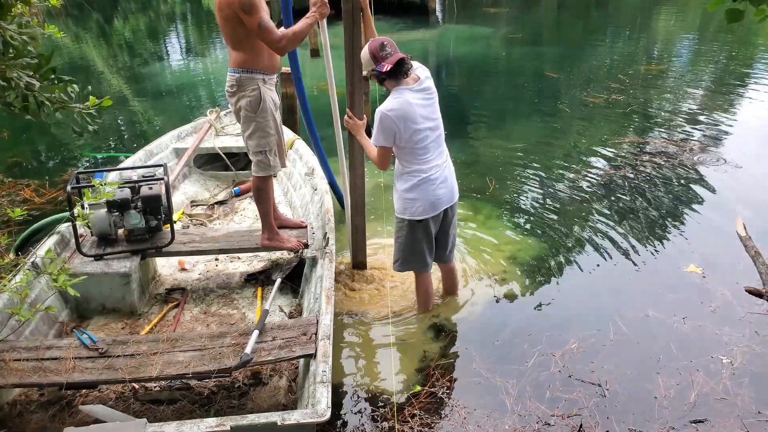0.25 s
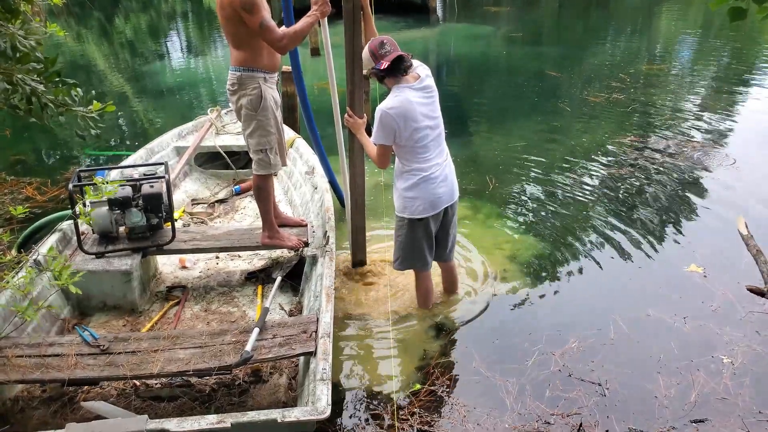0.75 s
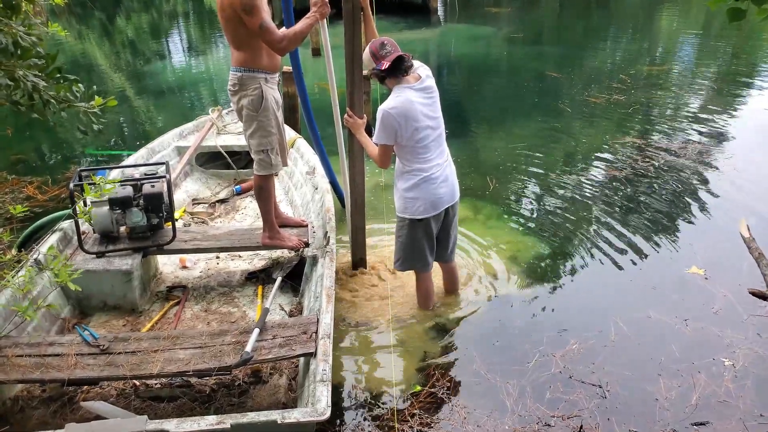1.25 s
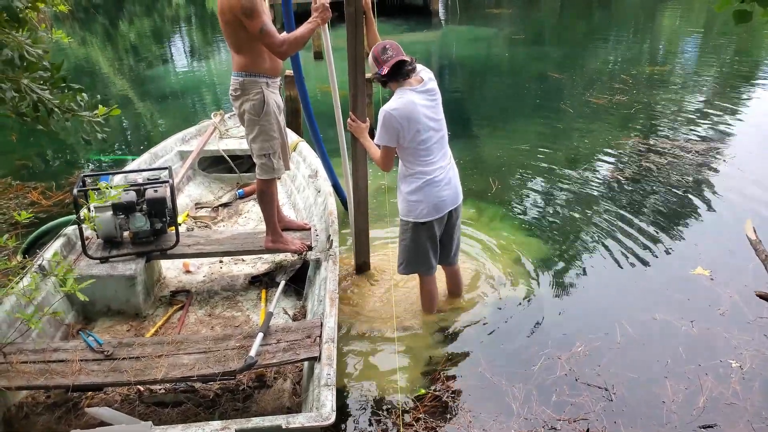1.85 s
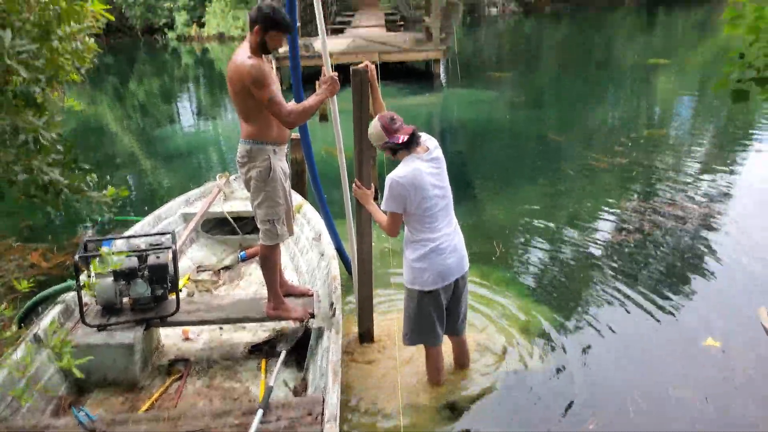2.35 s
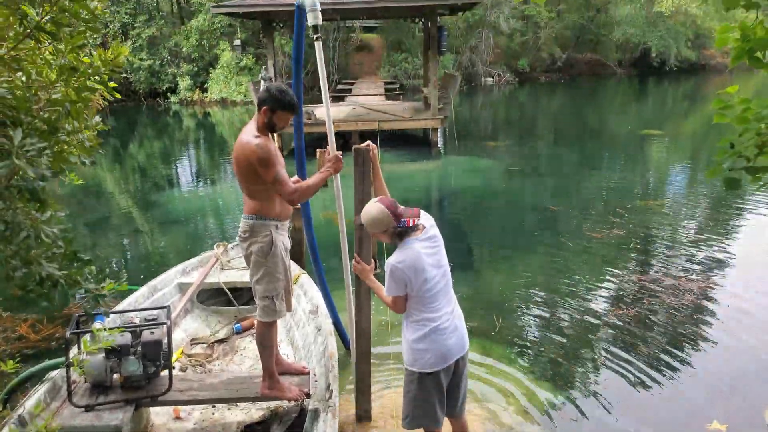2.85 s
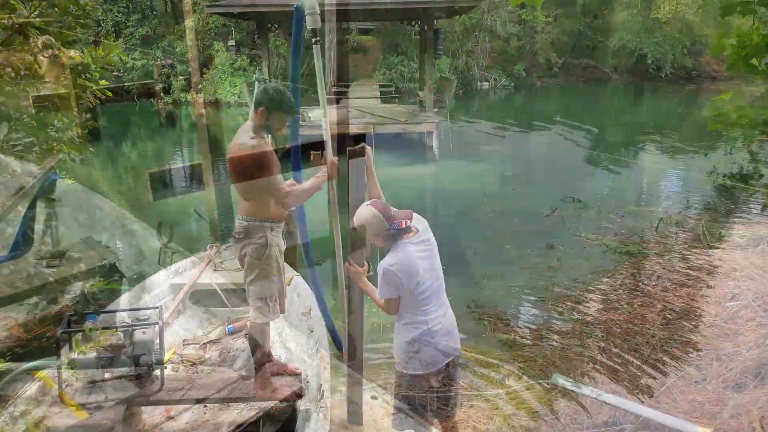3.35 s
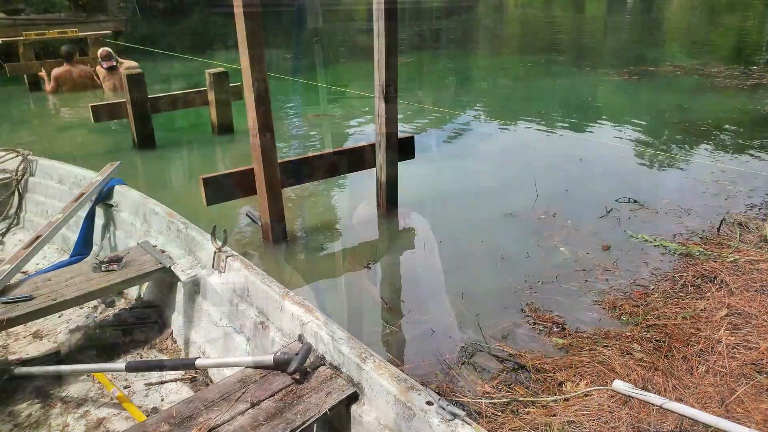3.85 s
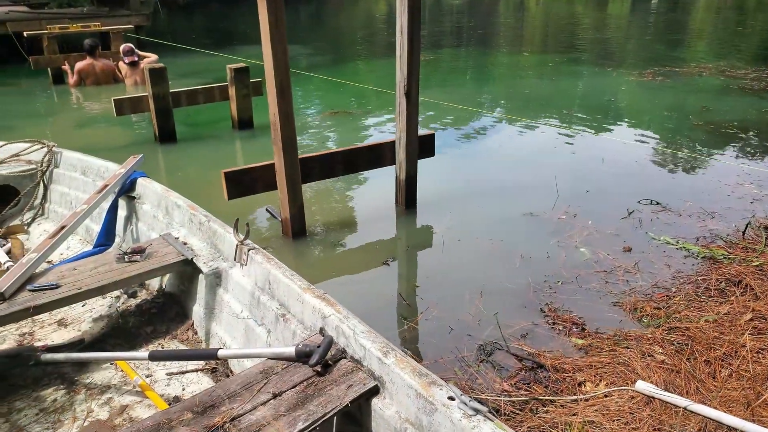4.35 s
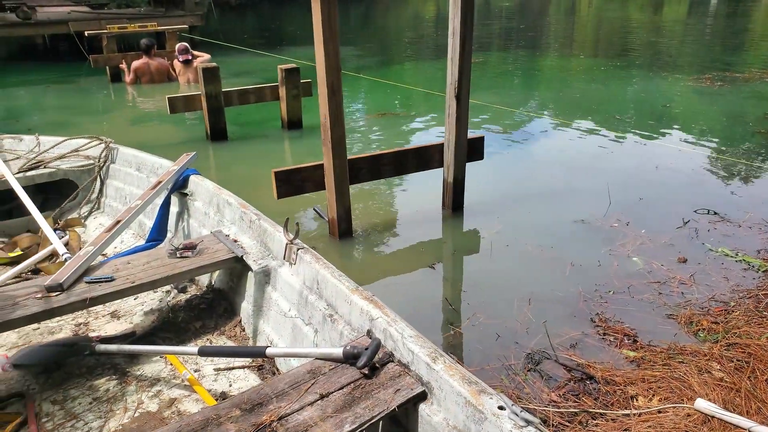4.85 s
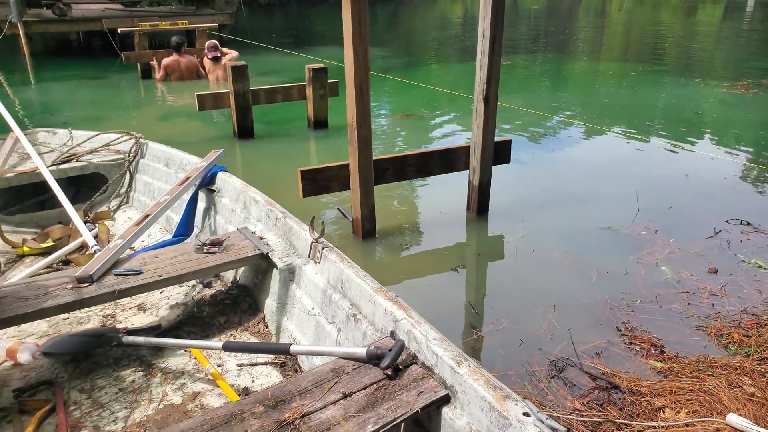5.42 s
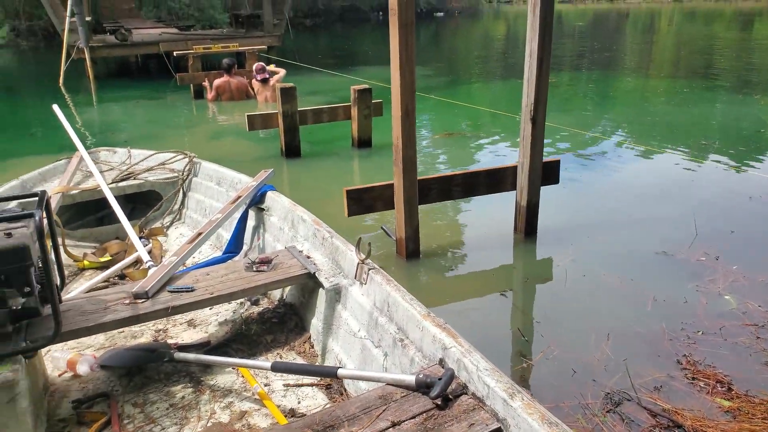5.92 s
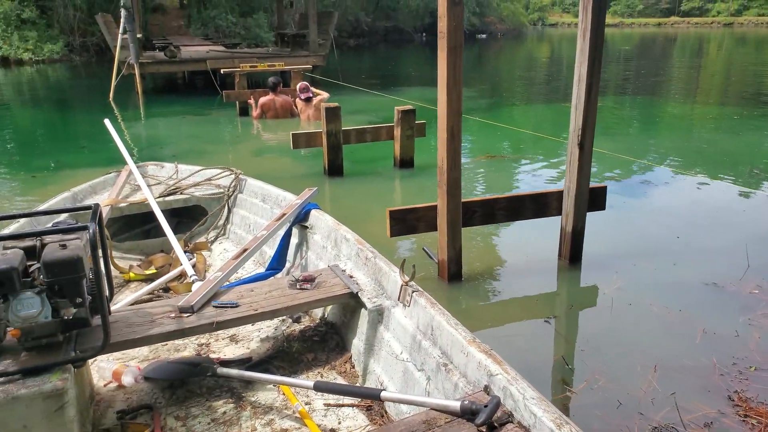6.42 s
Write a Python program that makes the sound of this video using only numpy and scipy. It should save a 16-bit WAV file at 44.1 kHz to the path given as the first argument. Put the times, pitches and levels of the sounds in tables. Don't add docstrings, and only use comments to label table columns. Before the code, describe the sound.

A small single-cylinder petrol pump runs close by in a boat, a rapid even putter with exhaust hiss, metallic ringing and clatter. Around the middle it crossfades gradually into a much quieter lake shore: two far engines throb and swell over soft air, rumble and thin insect song. Then wet wood is rubbed in two loud rasping, squeaky strokes, with hard knocks on the second and a few faint ones after. Stereo, weighted to the left.

```python
import sys
import numpy as np
from scipy import signal
from scipy.fft import rfft, irfft
from scipy.io import wavfile

SR = 44100
rng = np.random.default_rng(int(sys.argv[2]) if len(sys.argv) > 2 else 0)


def to_wav(sig):
    pcm = np.clip(np.atleast_2d(sig), -1, 1) * 32767
    pcm = np.round(pcm).astype(np.int16)
    wavfile.write(sys.argv[1], SR, pcm.T)


def convert_level_to_amplitude(level_db):
    exponent = np.asarray(level_db, float) / 20
    return 10 ** exponent


N = 294588
TIME = np.arange(N) / SR
HZ = np.maximum(np.fft.rfftfreq(N, 1 / SR), 10)


def rms_one(x):
    return x / np.sqrt(np.mean(np.atleast_2d(x).mean(axis=0) ** 2) + 1e-20)


def in_time(rows):
    seconds, *columns = np.transpose(rows)
    return [np.interp(TIME, seconds, column) for column in columns]


def at_hz(points):
    hz, db = np.transpose(points)
    return np.interp(np.log(HZ), np.log(hz), db)


def drift(rate_hz):
    r = np.exp(-80 * np.pi * rate_hz / SR)
    slow = signal.lfilter([1], [1, -2 * r, r * r], rng.standard_normal(N // 40 + 2002))
    slow = slow[2000:]
    return np.interp(np.arange(N) / 40, np.arange(len(slow)), rms_one(slow - slow.mean()))


def ring(clicks, hz, t60_s):
    r = convert_level_to_amplitude(-60 / (t60_s * SR))
    w = 2 * np.pi * hz / SR
    return signal.lfilter([0, np.sin(w)], [1, -2 * r * np.cos(w), r * r], clicks + 1e-18)


def orders(cycles, table, wander_db, phase):
    tones = 0
    for k, db in table:
        tones = tones + convert_level_to_amplitude(db + wander_db * drift(7.0)) * np.cos(2 * np.pi * k * cycles + phase(k))
    return tones


FLAT = ((10, 0), (20, 0))


def ports(x, other, left_db, alike, lag_s, colour=FLAT):
    left = convert_level_to_amplitude(at_hz(left_db))
    share = np.clip(at_hz(alike), 0, 1)
    late = np.exp(-2j * np.pi * HZ * lag_s)
    gain = 2 * convert_level_to_amplitude(at_hz(colour)) / np.sqrt(left ** 2 + 1 + 2 * left * share * late.real)
    right = late * share * rfft(x) + np.sqrt(1 - share ** 2) * rfft(other)
    return irfft(gain * np.array([left * rfft(x), right]), N)


# frequency in Hz, left over right in dB.
PUMP_LEFT = [(60, 8.8), (110, 9.2), (200, 10.2), (380, 9.6), (700, 9.9), (1290, 1.15), (2380, 10.6),
             (4400, 13.4), (8120, 4.9), (15000, 5.8)]
# frequency in Hz, likeness from 0 to 1.
PUMP_ALIKE = [(60, .97), (600, .94), (1500, .84), (3000, .62), (8000, .42)]
NEAR_LAG_S = .00018


def pump_ports(x, other, colour=FLAT, alike=PUMP_ALIKE):
    return ports(x, other, PUMP_LEFT, alike, NEAR_LAG_S, colour)


# multiple of the firing rate, level in dB.
PUMP_ORDERS = [(1, -21.5), (2, -3.5), (3, -1.5), (4, 1), (5, -4.5), (6, -4), (7, -12.5), (8, -14.5),
               (9, -11.5), (10, -16), (11, -69.5), (12, -15), (13, -14), (14, -29), (15, -23.5),
               (16, -18.5), (17, -45), (18, -15.5), (19, -11.5), (20, -23), (21, -22.5), (22, -15.5),
               (23, -13.5), (24, -24), (25, -15), (26, -26), (27, -50), (28, -22.5), (29, -52), (30, -19)]


def exhaust(cycles):
    pulse_at, pipe_echo, echo_share = .062, .283, .9
    chamber_lag = .14

    def phase(k):
        echo = echo_share * np.exp(-2j * np.pi * k * pipe_echo)
        beat = np.angle(echo - 1) - 2 * np.pi * k * pulse_at
        return beat - 2 * np.pi * chamber_lag * (3 <= k <= 7)

    tones = orders(cycles + 0.00065 * drift(4.5), PUMP_ORDERS, wander_db=0.76, phase=phase)
    return pump_ports(tones, tones, alike=[(10, 1), (20, 0.68)])


# frequency in Hz, level in dB per Hz.
BLAST = [(300, -32), (1200, -8), (2300, -8), (3500, -0.5), (4500, -6), (5500, -8.5), (7300, -16.5),
         (8800, -10.5), (11000, -11.5), (13000, -11), (16000, -16)]


def valve_hiss(cycles):
    since, turn = cycles % 1, cycles.astype(int)
    strength = rng.standard_normal(turn[-1] + 1)
    burst = np.minimum(since / .012, 1) * (.6 * np.exp(-since / .06) + .7 * np.exp(-since / .3))
    burst = burst * convert_level_to_amplitude(1.2 * strength[turn] + 1.5 * drift(300))
    return rms_one(pump_ports(*(burst * rng.standard_normal((2, N))), BLAST))


# frequency in Hz, level in dB per Hz.
CLATTER = [(30, -26), (110, -3), (300, -12.5), (650, -6.5), (850, -11), (1050, -9.5), (1500, -9.5),
           (1700, -17.5), (1950, -12.5), (2430, -20.5), (2770, -12), (4400, -19.5), (6300, -28.5),
           (16000, -28.5)]


def clatter():
    return rms_one(pump_ports(*rng.standard_normal((2, N)), CLATTER))


# frequency in Hz, level in dB, 60 dB decay in seconds.
SHELL = [(1001, -2, 0.095), (1483, -3.5, 0.063), (1876, -1.5, 0.029), (2722, 3, 0.042), (2722, -1.5, 0.055),
         (2920, 3, 0.04), (3654, -10.5, 0.16), (4040, -1.5, 0.037), (4304, -11.5, 0.13),
         (4450, -12.5, 0.056), (4570, -17.5, 0.081)]


def shell(cycles):
    fired = np.flatnonzero(np.diff(cycles.astype(int)))
    draws = rng.random((len(fired), 2, len(SHELL), 2))
    out = np.zeros((2, N))
    for k, (hz, db, t60_s) in enumerate(SHELL):
        clicks = np.zeros((2, N + 99))
        for side in (0, 1):
            late, strength = draws[:, side, k].T
            delay = ((.0008 + .002 * late) * SR).astype(int)
            clicks[side, fired + delay] = convert_level_to_amplitude(db + 14 * strength)
        out += ring(clicks[:, :N], hz, t60_s)
    return rms_one(pump_ports(*out))


# time in seconds, firings per second.
PUMP_SPEED = [(0.0, 29.81), (0.4, 29.84), (0.8, 29.775), (1.2, 29.745), (1.4, 29.69), (1.8, 29.75),
              (2.4, 29.625), (3.0, 29.69), (3.2, 29.66), (3.6, 29.77)]


def pump():
    cycles = np.cumsum(in_time(PUMP_SPEED)[0]) / SR + .082
    noise = convert_level_to_amplitude(-8) * valve_hiss(cycles) + convert_level_to_amplitude(-1.0) * clatter() + convert_level_to_amplitude(-5) * shell(cycles)
    return convert_level_to_amplitude(-34.5) * exhaust(cycles) + convert_level_to_amplitude(-37) * noise


# time in seconds, share of the swing done.
SWING = [(2.3, 0), (2.65, 0.71)]
# frequency in Hz, change in dB.
SWUNG = [(800, 0.5), (1200, -2.5), (1650, 2.5), (2050, -6.5), (2450, 2), (2700, -5.5), (2900, 2),
         (3300, 1.5), (4200, -3), (4450, 5), (4700, -4), (5500, 0), (8000, -0.5)]


def swung(x):
    share = np.clip(in_time(SWING)[0], 0, 1)
    return (1 - share) * x + share * irfft(rfft(x) * convert_level_to_amplitude(at_hz(SWUNG)), N)


# frequency in Hz, left over right in dB.
SHORE_LEFT = [(60, 2.6), (110, 7.4), (200, 7.8), (380, 8.5), (700, 9.5), (1290, 12), (2380, 16.7),
              (4400, 24), (8120, 5.1), (15000, 4.1)]
# frequency in Hz, likeness from 0 to 1.
SHORE_ALIKE = [(60, 0.37), (600, 0.5), (1500, 0.33), (3000, 0.21), (8000, .2)]


def shore_ports(x, other, colour=FLAT, alike=SHORE_ALIKE):
    return ports(x, other, SHORE_LEFT, alike, 0.00037, colour)


# multiple of its rate, level in dB.
FAR_ORDERS = [(1, -27), (2, -3.5), (3, 2.5), (4, -23), (5, -4), (6, -10.5), (7, -22.5), (8, -15), (9, -23),
              (10, -34)]
# multiple of its rate, level in dB.
OTHER_ORDERS = [(1, -15), (4, -13)]
# time in seconds, first engine in dB, drone of the second in dB.
CARRY = [(4.0, -50, -62.5), (4.6, -51, -78.5), (5.05, -49.5, -66), (5.5, -55, -65), (5.9, -53.5, -73),
         (6.1, -49.5, -68), (6.4, -54, -65), (6.68, -57, -64)]
# crest in seconds, level in dB, half length in seconds.
SWELLS = [
    (4.08, -46, 0.26),
    (5.05, -49, 0.39),
    (6.025, -46, 0.17),
    (6.62, -51.5, 0.053),
]


def far_engines():
    first_db, drone_db = in_time(CARRY)
    first_turns = 27.03 * TIME + 0.0057 * drift(1.5)
    first = orders(first_turns, FAR_ORDERS, wander_db=1.5, phase=lambda k: -1.5 * k)
    turns = 57.55 * TIME + 0.043 * drift(1.9)
    second = orders(turns, OTHER_ORDERS, wander_db=3.0, phase=lambda k: 0)
    swell = convert_level_to_amplitude(-58)
    for crest, db, half in SWELLS:
        swell = swell + convert_level_to_amplitude(db) * np.exp(-((TIME - crest) / half) ** 2)
    boom = 2 * swell * np.cos(2 * 2 * np.pi * turns)
    drone = convert_level_to_amplitude(drone_db + 5.5) * np.cos(6.05 * 2 * np.pi * turns)
    tones = convert_level_to_amplitude(first_db + 4.5) * first + convert_level_to_amplitude(-48.5) * second + boom + drone
    return shore_ports(tones, tones, alike=[(10, 1), (20, 0.98)])


# frequency in Hz, level in dB per Hz.
AIR = [(150, -23), (260, -4), (450, -12), (650, -9.5), (800, -17), (1200, -15), (2570, -20.5),
       (4300, -17.5), (4900, -23), (5500, -36), (7300, -43.5), (9000, -32.5), (12000, -38), (16000, -33)]


def air():
    return rms_one(shore_ports(*rng.standard_normal((2, N)), AIR)) * convert_level_to_amplitude(0.35 * drift(12))


# frequency in Hz, level in dB per Hz.
INSECTS = [(9000, -40), (9500, -6), (9750, -2), (10100, -5), (10400, 6), (10600, -7), (11400, -11),
           (11800, -40)]


def insects():
    return rms_one(shore_ports(*rng.standard_normal((2, N)), INSECTS)) * convert_level_to_amplitude(-17.5 + 1.5 * drift(4.2))


# frequency in Hz, level in dB per Hz.
RUMBLE = [(25, -8), (50, 7.5), (100, 8.5), (170, 3.5), (300, -17), (500, -44)]


def rumble():
    return convert_level_to_amplitude(5.5) * rms_one(shore_ports(*rng.standard_normal((2, N)), RUMBLE))


def shore():
    return far_engines() + convert_level_to_amplitude(-54.5) * (air() + insects() + rumble())


def dissolve():
    from_s, to_s = 2.727, 4.1
    return np.clip((TIME - from_s) / (to_s - from_s), 0, 1)


# frequency in Hz, left over right in dB.
RUB_LEFT = [(60, 4.0), (110, 6.9), (200, 5.1), (380, 11), (700, 2.2), (1290, 3), (2380, 14.7), (4400, 18.0),
            (8120, 6.7), (15000, 4.0)]


def wood_ports(x, other, colour=FLAT, alike=SHORE_ALIKE):
    return ports(x, other, RUB_LEFT, alike, NEAR_LAG_S, colour)


def strokes(rows, echo_db=-99):
    attack, release, echo_fall = 1300, 378, 92
    level = np.full(N, -140.)
    for s, hold, start_db, end_db in rows:
        held = np.interp(TIME, [s, s + hold], [start_db, end_db]) - attack * np.maximum(s - TIME, 0)
        after = np.maximum(TIME - s - hold, 0)
        fall = np.minimum(release * after, echo_fall * after - echo_db)
        level = np.maximum(level, held - fall)
    return convert_level_to_amplitude(level)


# start in seconds, hold in seconds, level at the start in dB, at the end in dB.
SCUFFS = [
    (3.965, 0.0092, -50, -53),
    (4.03, .025, -49, -52.5),
    (5.082, .01, -52, -52),
    (5.666, 0.011, -48.5, -53),
    (5.695, .005, -58, -55),
]
# frequency in Hz, level in dB per Hz.
SCUFF = [(300, -25), (700, -6), (1150, 0), (1900, -2), (2400, -13), (4000, -17), (4700, -8), (5600, -30)]


def scuffs(slips):
    return strokes(SCUFFS) * rms_one(wood_ports(*slips, SCUFF, PUMP_ALIKE))


# start in seconds, hold in seconds, level at the start in dB, at the end in dB.
RUBS = [
    (4.455, 0.093, -49.5, -52.5),
    (4.78, .015, -48, -41),
    (4.8, 0.11, -33, -30.5),
    (4.94, .025, -43, -45),
    (5.14, 0.093, -33.5, -29.5),
    (5.24, 0.073, -35.5, -40),
]
# frequency in Hz, level in dB per Hz.
RASP = [(470, -39), (800, -57), (1050, -8.5), (1300, -21), (1460, -7.5), (1880, -10.5), (2350, 0.5),
        (2570, -5.5), (3510, -0.5), (4460, -2.5), (6330, -18.5), (9100, -17.5), (16000, -28)]
# frequency in Hz, level in dB, 60 dB decay in seconds.
RASP_BANDS = [(1500, -6, 0.018), (2105, 6, 0.044), (2400, -2, 0.03), (2980, 5, 0.078), (3520, -2, .015),
              (4360, 4, 0.024), (4800, -14, 0.013)]


def rasp(slips, echo_db):
    rough = rms_one(wood_ports(*slips, RASP))
    plank = 0
    for hz, db, t60_s in RASP_BANDS:
        plank = plank + convert_level_to_amplitude(db + 3 * drift(60)) * ring(slips, hz, t60_s)
    rough = rough + convert_level_to_amplitude(-8.0) * rms_one(wood_ports(*plank))
    return convert_level_to_amplitude(-1.5) * strokes(RUBS, echo_db) * rough


# start in seconds, hold in seconds, level at the start in dB, at the end in dB.
DRAGS = [
    (4.82, 0.12, -60, -62),
    (5.141, .008, -38.5, -39),
    (5.204, 0.064, -35, -32.5),
]
# frequency in Hz, level in dB per Hz.
DRAG = [(150, -21), (300, 1), (570, 19), (1000, 10.5), (1500, -22)]


def drag(slips, echo_db):
    return convert_level_to_amplitude(-3.5) * strokes(DRAGS, echo_db) * rms_one(wood_ports(*slips, DRAG))


def rubs():
    slips = rng.standard_normal((6, N)) * convert_level_to_amplitude(2.2 * drift(200))
    echo_db = -10.5
    return scuffs(slips[4:]) + rasp(slips[:2], echo_db) + drag(slips[2:4], echo_db)


# start in seconds, peak in dB, crack in dB, thud in dB, plank in dB.
KNOCKS = [
    (4.454, -48, 7, -10, -6),
    (5.071, -31, -20, 6, -5),
    (5.205, -27, -6, -10, -1),
    (5.214, -25, 3, 0, -2),
    (5.229, -23, -6, -6, -1),
    (5.661, -47, -14, -12, -4),
    (5.671, -36, -11, -2, -1),
    (5.694, -45, -13, -9, 0),
]
# frequency in Hz, level in dB, 60 dB decay in seconds.
WOOD = [(166, -2, 0.017), (582, -10, 0.089), (693, -4, 0.091), (1060, -5, 0.1), (1480, 6, 0.022),
        (2850, 11, .015)]


def knocks():
    out, t = np.zeros(N), np.arange(4000) / SR
    edge = signal.butter(2, [2500, 13000], "band", fs=SR, output="sos")
    push = t / 0.00014 * np.exp(1 - t / 0.00014)
    for s, db, crack_db, thud_db, plank_db in KNOCKS:
        noise = signal.sosfilt(edge, rng.standard_normal(len(t)))
        crack = convert_level_to_amplitude(crack_db) * noise * np.exp(-t / 0.00094)
        body = 0
        for hz, level, t60_s in WOOD:
            uneven_db = 2.5 * rng.standard_normal()
            body = body + convert_level_to_amplitude(level + uneven_db + thud_db * (hz < 300)) * ring(push, hz, t60_s)
        start = round(s * SR)
        out[start:start + len(t)] += convert_level_to_amplitude(db) * (push + crack + convert_level_to_amplitude(plank_db - 27.0) * body)
    return wood_ports(out, np.roll(out, 31), alike=PUMP_ALIKE)


# start in seconds, seconds to top speed, length in seconds, slips per second at rest,
# slips per second at top speed.
SQUEAKS = [
    (4.8, .0625, .125, 985, 1220),
    (5.138, .066, .072, 740, 1170),
]
# frequency in Hz, level in dB.
SQUEAK_BODY = [(1200, -19), (1500, 1), (1800, -16), (2200, -8), (2420, -1), (2750, -8), (3600, -4),
               (3900, -18)]


def squeaks():
    out = 0
    body_hz, body_db = np.transpose(SQUEAK_BODY)
    for s, to_top, length, rest_hz, top_hz in SQUEAKS:
        t = TIME - s
        hz = rest_hz + (top_hz - rest_hz) * abs(np.sin(np.pi / 2 * t / to_top)) ** 3
        turns = 2 * np.pi * np.cumsum(hz * (1 + .008 * drift(150))) / SR
        edges = np.clip(np.minimum(t, length - t) / .01, 0, 1)
        gain = edges * convert_level_to_amplitude(-31.5 + 3 * drift(90))
        for k in range(1, 5):
            out = out + gain * convert_level_to_amplitude(np.interp(k * hz, body_hz, body_db)) * np.sin(k * turns)
    return wood_ports(out, np.roll(out, 97))


def scene():
    share = dissolve()
    return (1 - share) * swung(pump()) + share * shore() + rubs() + knocks() + squeaks()


def roll_off(x):
    return signal.sosfilt(signal.butter(12, 16720, fs=SR, output="sos"), x)


# frequency in Hz, level in dB.
MICROPHONE = [(20, -1.5), (6500, -1), (7350, -7.5), (8300, -1), (11500, -1), (12200, -4.5), (13500, -5.5),
              (15500, -4.5)]


def record(dry):
    heard = irfft(rfft(dry) * convert_level_to_amplitude(at_hz(MICROPHONE)) * (HZ < 16000), N)
    return roll_off(heard)


dry = scene()
out = record(dry)
to_wav(out)
```